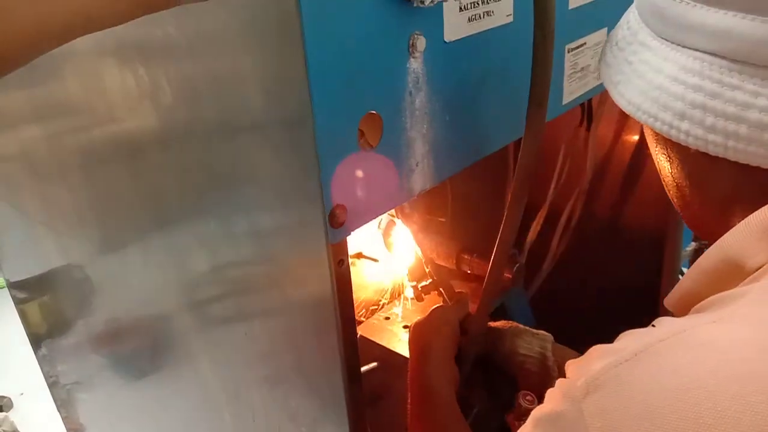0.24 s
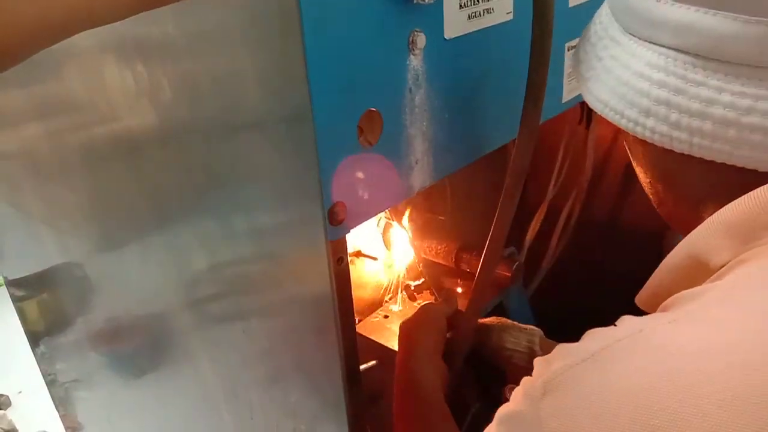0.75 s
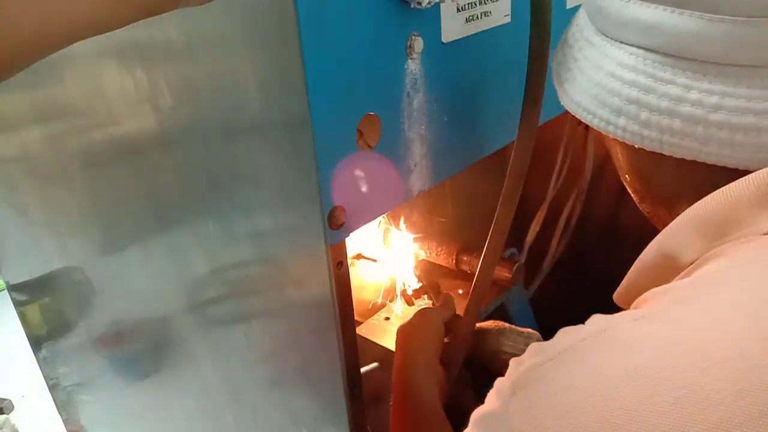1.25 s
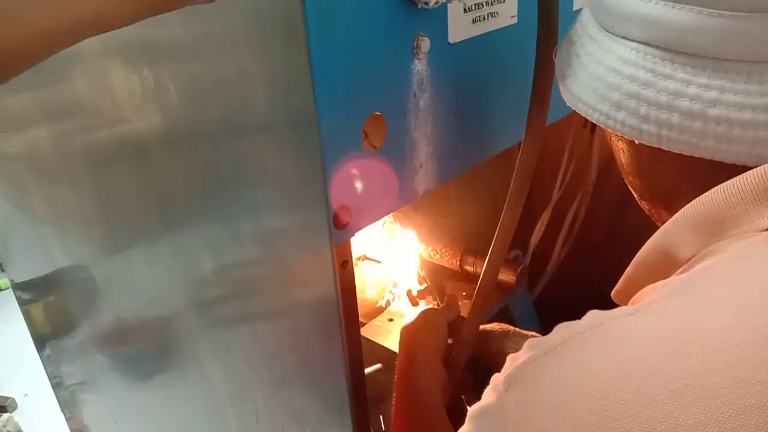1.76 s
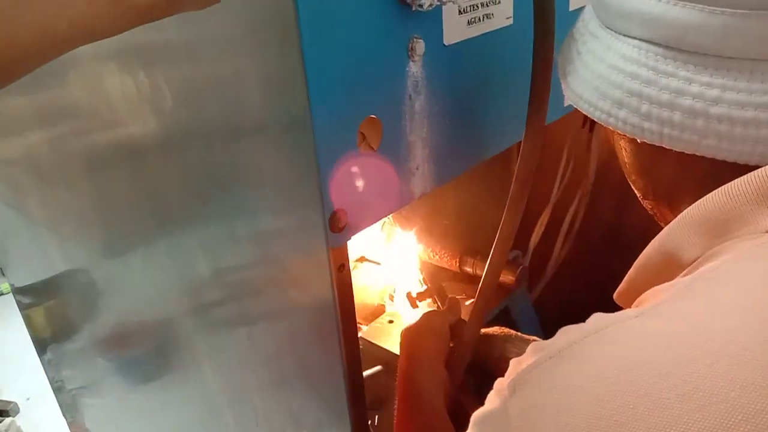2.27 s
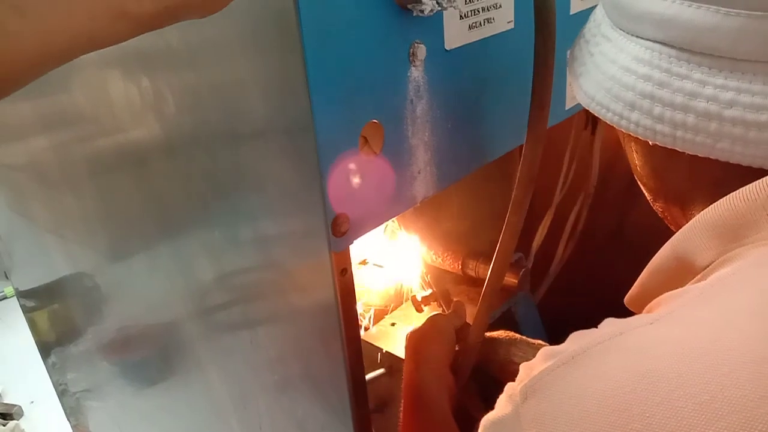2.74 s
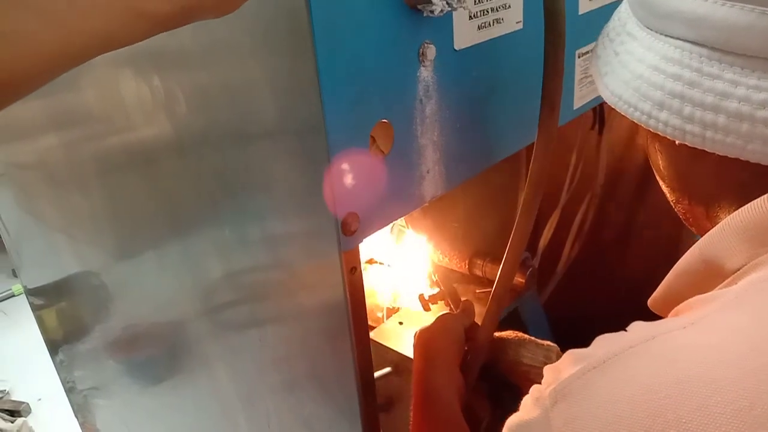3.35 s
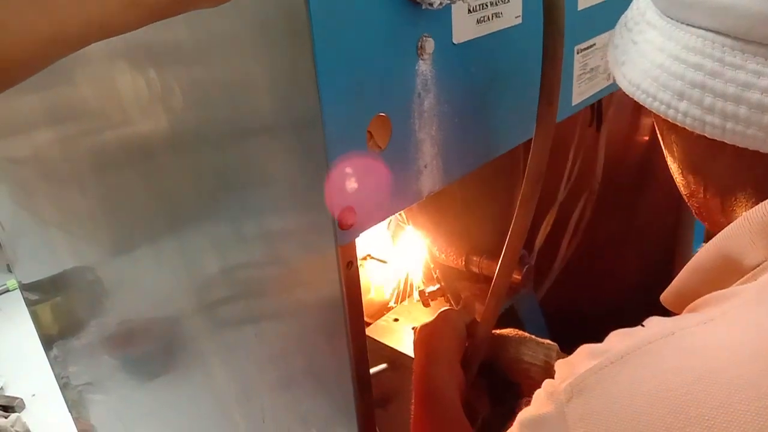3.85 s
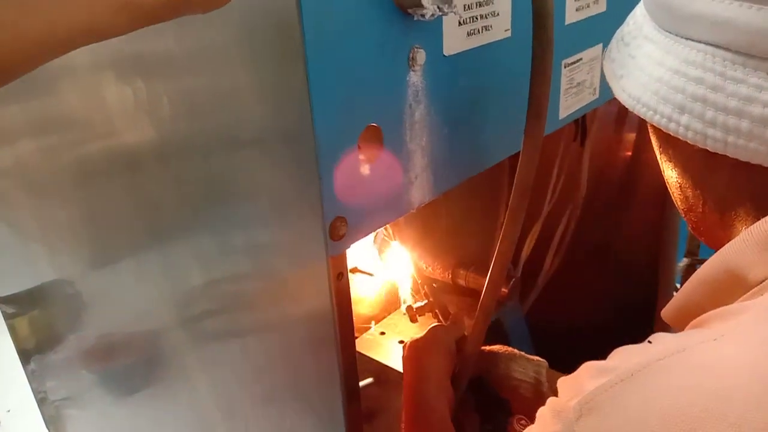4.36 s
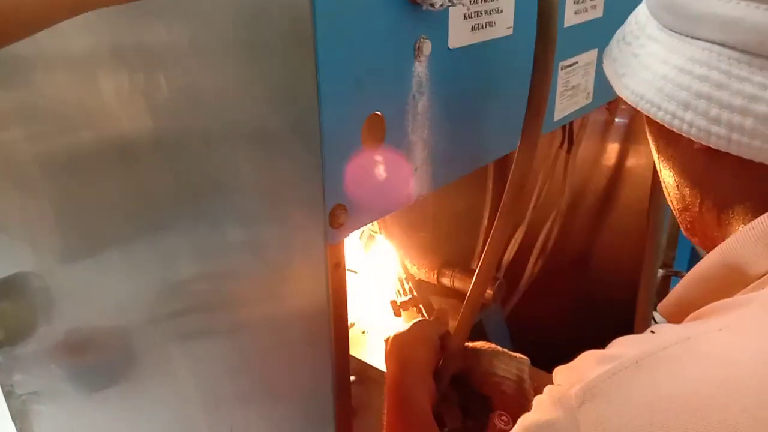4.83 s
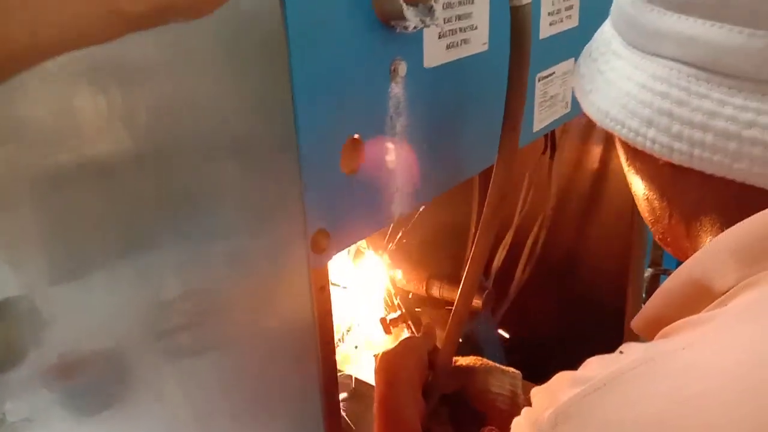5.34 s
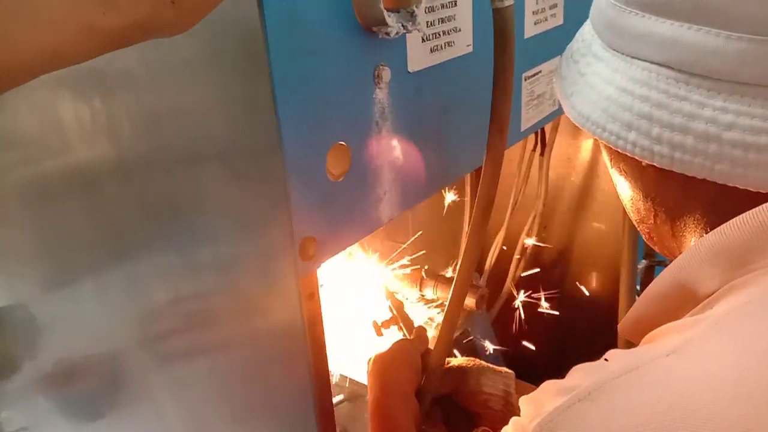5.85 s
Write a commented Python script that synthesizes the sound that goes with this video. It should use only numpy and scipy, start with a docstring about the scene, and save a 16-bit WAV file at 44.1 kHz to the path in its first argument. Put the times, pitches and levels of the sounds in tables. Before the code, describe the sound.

A cutting torch burns steel inside an open sheet-metal cabinet. A gusty midrange flame roar and bright oxygen hiss run throughout, surging unevenly over soft low puffs. Brief near-whistles ring from the hollow behind the cut, and fine metal spatter fizzes. A few sparks crackle, and the end grows rougher and more sizzling. Captured by a phone at arm's length, identical in both channels, with the extreme top missing.

```python
"""A gas flame roars and an oxygen jet hisses: a torch cuts steel inside an open sheet-metal cabinet.
Flame and jet are gusty noise filtered by the cabinet's resonances; the flame also flutters and puffs.
The jet rings the hollow behind the cut, at times almost whistling, and the slot adds a narrow edge tone.
Random droplet bursts make the steel fizz, and a few larger sparks crackle and die away.
An arm's length away, a phone takes it in without the extreme top."""
import sys
import numpy as np
from scipy import signal
from scipy.fft import rfft, irfft
from scipy.io import wavfile
from scipy.ndimage import uniform_filter1d, map_coordinates

SR = 44100
rng = np.random.default_rng(int(sys.argv[2]) if len(sys.argv) > 2 else 0)


def bounce(signal):
    """Save signal as a 16-bit WAV file at the path given by the first command-line argument."""
    frames = np.transpose(np.atleast_2d(signal))
    limited = np.clip(frames, -1, 1)
    pcm = np.round(limited * 32767).astype(np.int16)
    wavfile.write(sys.argv[1], SR, pcm)


N = 268877
TIME = np.arange(N) / SR  # s
FREQ = np.arange(N // 2 + 1) * SR / N  # Hz


# Flame roar spectrum. Each row: frequency in Hz, relative density in dB.
FLAME_COLOUR = [(300, -59), (450, -13.5), (600, -4.5), (1100, 0), (1500, -3), (2200, -2.5), (2700, -12),
                (4000, -45), (8000, -60)]
# Unsteady burning. Each row: time in seconds, flutter level in dB.
FLUTTER = [(0.0, -44), (0.49, -42), (0.52, -35.5), (0.71, -45.5), (0.75, -40), (1.17, -50), (1.38, -41.5),
           (2.43, -45.5), (2.68, -38), (2.94, -46), (3.69, -45.5), (3.72, -54), (4.01, -41), (5.43, -47),
           (5.77, -38), (5.84, -46), (5.98, -35), (6.1, -45)]
# Flutter spectrum. Each row: frequency in Hz, relative density in dB.
FLUTTER_COLOUR = [(30, -35), (55, -26), (85, -11.5), (130, -16), (220, -25), (300, -13), (450, -2.5),
                  (540, 2), (800, -33)]
# Flame puffs that shake the cabinet air. Each row: start in seconds, length in seconds,
# boom level in dB before puff_trim_db.
PUFFS = [(0.03, 0.085, -42.5), (1.65, 0.05, -46), (1.818, 0.073, -41), (1.94, 0.038, -42),
         (2.301, 0.032, -43), (2.405, 0.046, -45), (2.712, 0.038, -47), (2.794, 0.048, -43),
         (2.97, 0.11, -40.5), (3.925, 0.14, -39.5), (4.175, 0.044, -46), (4.242, 0.066, -42),
         (4.323, 0.03, -41), (4.374, 0.043, -44), (4.46, 0.034, -46), (4.558, 0.061, -43),
         (4.817, 0.044, -42), (5.899, 0.094, -42)]
# Boom spectrum. Each row: frequency in Hz, relative density in dB.
BOOM_COLOUR = [(40, -33), (75, -5), (120, 0), (210, -2), (260, -9), (330, -26), (700, -50)]
PUFF_ATTACK_S, PUFF_RELEASE_S = 0.025, 0.03
RUMBLE_DB, RUMBLE_GUST_DB, RUMBLE_PER_S = -53.5, 3.5, 12  # small puffs between the listed ones


def flame(roar_db, cabinet, roar_trim_db=4.5, puff_trim_db=-2.1):
    """Turbulent burning roars in the cabinet, over an uneven flutter and soft booming puffs."""
    roar = turbulence(cabinet * colour(FLAME_COLOUR), rate=45, gust_db=0.6)
    roar = roar * undb(roar_db + roar_trim_db)

    flutter_db, = curves(FLUTTER)
    flutter = turbulence(cabinet * colour(FLUTTER_COLOUR), rate=16, gust_db=3.0) * undb(flutter_db)

    puffs = swells(PUFFS, PUFF_ATTACK_S, PUFF_RELEASE_S) * undb(puff_trim_db)
    rumble = undb(RUMBLE_DB + RUMBLE_GUST_DB * walk(RUMBLE_PER_S))
    boom = turbulence(cabinet * colour(BOOM_COLOUR), rate=15, gust_db=0.5)
    boom = boom * np.hypot(puffs, rumble)  # powers add
    return roar + flutter + boom


# Jet hiss spectrum. Each row: frequency in Hz, relative density in dB.
OXYGEN_COLOUR = [(1400, -38.5), (2200, -6), (2700, -3.5), (4300, -4), (5900, -5), (6250, -10.5),
                 (6700, -7.5), (7650, -10.5), (8200, -23), (11000, -26), (13400, -28), (15500, -22.5)]


def oxygen(hiss_db, cabinet, trim_db=0.13):
    """The fast cutting jet hisses through the slot in the steel and echoes off the panels."""
    jet = turbulence(cabinet * colour(OXYGEN_COLOUR), rate=57, gust_db=0.27)
    return panels(jet, echo=0.15, longest_s=0.007, sway_s=0.00005) * undb(hiss_db + trim_db)


# Edge tone of the slot as the torch moves along. Each row: time in seconds, centre in Hz,
# level in dB over the hiss curve before trim_db.
SLOT = [(0, 7060, -27), (.5, 7100, -16), (.65, 6570, -16), (1.1, 6560, -8.5), (2.2, 6580, -19),
        (2.6, 7050, -31), (3.1, 7000, -16), (3.6, 7030, -13), (4.1, 7300, -25), (4.9, 7400, -19),
        (5.3, 7450, -22), (5.55, 7200, -10), (6.1, 7180, -15)]


def edge_tone(hiss_db, half_width_hz=160, trim_db=0.5):
    """A narrow band of hiss whose pitch follows the changing width of the slot."""
    centre_hz, lift_db = curves(SLOT)
    band = unit(shape(rng.standard_normal(N), 1 / (1 + (FREQ / half_width_hz) ** 2)))
    carrier = np.cos(2 * np.pi * np.cumsum(centre_hz) / SR)
    return unit(band * carrier) * undb(hiss_db + lift_db + trim_db)


# Close pair of the hollow. Each row: frequency in Hz, width in Hz, relative level in dB.
HOLLOW = [(1244, 16, 4), (1263, 11.7, 8.5)]
# Jet on the hollow behind the cut. Each row: time in seconds, level in dB before blow_trim_db.
BLOW = [(0.0, -39), (0.08, -33), (0.13, -42), (0.98, -32), (1.07, -41), (1.29, -32.5), (1.78, -32.5),
        (1.97, -26), (2.02, -37), (2.22, -44), (2.29, -30.5), (2.95, -35), (3.04, -25), (3.07, -30),
        (4.04, -37), (4.09, -31), (4.57, -33.5), (6.1, -30)]
# Near-whistles of the hollow. Each row: start in seconds, length in seconds,
# level in dB before whistle_trim_db.
WHISTLES = [(1.255, 0.034, -28), (1.32, 0.032, -28), (1.491, 0.03, -29), (1.68, 0.032, -29),
            (1.898, 0.076, -28), (2.3, 0.035, -25.5), (2.572, 0.036, -28.5), (2.7, 0.034, -30),
            (2.853, 0.045, -28.5), (3.007, 0.064, -26), (3.376, 0.036, -29.5), (3.692, 0.042, -30),
            (3.933, 0.048, -28), (4.059, 0.075, -28.5), (4.2, 0.14, -27), (4.398, 0.052, -27),
            (4.473, 0.052, -28.5), (4.685, 0.038, -29), (4.995, 0.03, -29), (5.176, 0.032, -30.5),
            (5.254, 0.068, -29.5), (5.33, 0.034, -28), (5.833, 0.04, -26), (6.016, 0.038, -28)]
# Lower ring of the gap, a close pair. Each row: frequency in Hz, width in Hz, relative level in dB.
GAP_LOWER = [(1751, 18, 1), (1803.5, 26, 2)]
# Strength of the lower ring. Each row: time in seconds, level in dB before gap_trim_db.
GAP = [(0.0, -45), (1.02, -35.5), (1.12, -44), (1.42, -32), (1.53, -41), (1.65, -36), (4.02, -37.5),
       (4.09, -29.5), (4.8, -36.5), (5.81, -37), (5.89, -30), (6.1, -39)]
# Broad upper ring of the gap. Each row: frequency in Hz, width in Hz, relative level in dB.
GAP_UPPER = [(3820, 380, 0)]
WHISTLE_ATTACK_S, WHISTLE_RELEASE_S = 0.02, 0.019
GAP_UPPER_DB = -8  # over the hiss curve


def hollow(hiss_db, waver_db=2.5, wavers_per_s=11,
           blow_trim_db=-0.5, whistle_trim_db=0.7, gap_trim_db=0.3):
    """The jet rings the hollow and the gap behind the cut; now and then the hollow nearly whistles."""
    blow_db, = curves(BLOW)
    gap_db, = curves(GAP)
    blow = undb(blow_db + blow_trim_db + waver_db * walk(wavers_per_s))
    whistles = swells(WHISTLES, WHISTLE_ATTACK_S, WHISTLE_RELEASE_S) * undb(whistle_trim_db)
    main = ring(HOLLOW, skirt_hz=65, steadiness=0.81) * np.maximum(blow, whistles)
    lower = ring(GAP_LOWER, skirt_hz=110, steadiness=0.26) * undb(gap_db + gap_trim_db)
    upper = ring(GAP_UPPER, skirt_hz=400, steadiness=0.1) * undb(hiss_db + GAP_UPPER_DB)
    return main + lower + upper


def ring(modes, skirt_hz, steadiness):
    """Gas drives resonances close to a whistle, which evens out their swell."""
    skirt = 1 / (1 + ((FREQ - modes[-1][0]) / skirt_hz) ** 2)
    tone = unit(shape(rng.standard_normal(N), np.sqrt(resonances(modes)) * skirt))
    power = uniform_filter1d(tone ** 2, size=1500)  # over 34 ms
    return unit(tone / power ** (steadiness / 2))


# Jet skimming an edge of the cut. Each row: start in seconds, length in seconds, level in dB,
# centre in Hz, width in Hz.
RUSHES = [(.45, 0.87, -39, 2220, 340), (4.15, 0.32, -30.5, 1490, 380)]
RUSH_ATTACK_S, RUSH_RELEASE_S = 0.11, 0.089


def rushes():
    """A broad band of noise swells while the jet skims an edge."""
    total = np.zeros(N)
    for start_s, length_s, db, centre_hz, width_hz in RUSHES:
        band = 1 / (1 + (2 * (FREQ - centre_hz) / width_hz) ** 4)
        swell = swells([(start_s, length_s, db)], RUSH_ATTACK_S, RUSH_RELEASE_S)
        total += turbulence(band, rate=45, gust_db=0.2) * swell
    return total


# Droplet fizz spectrum. Each row: frequency in Hz, relative density in dB.
SPATTER_COLOUR = [(1500, -25), (3500, -12), (7400, 2.5), (8300, -0.5), (9400, 2.5), (11000, 1),
                  (12300, -2.5), (13700, -12), (14700, 3), (15500, -3)]


def spatter(fizz_db, per_second=6000, spread_db=1.5, trim_db=1.8):
    """Countless droplets of molten steel burst at random, fewer the larger they are."""
    bursts = rng.random(N) < per_second / SR
    size = undb(spread_db * np.minimum(rng.exponential(size=N), 5))
    fizz = shape(bursts * size * rng.standard_normal(N), colour(SPATTER_COLOUR))
    return panels(fizz, echo=0.37, longest_s=0.008, sway_s=0.00004) * undb(fizz_db + trim_db)


# Sparks that burst. Each row: start in seconds, initial level in dB, fade time to -60 dB in seconds.
SPARKS = [(2.651, -27, 0.2), (3.695, -43, 0.8), (5.532, -35, 1)]
# Spark spectrum. Each row: frequency in Hz, relative density in dB.
SPARK_COLOUR = [(1000, -22), (3000, 9), (7000, 4), (9000, -0.5), (13000, -2), (15500, 3)]


def sparks(crackle_db=2.0):
    """A larger spark cracks at once and dies away exponentially in a crackle."""
    fade = np.zeros(N)
    for start_s, db, t60_s in SPARKS:
        age_s = np.maximum(TIME - start_s, 0)
        fade += (TIME >= start_s) * undb(db) * np.exp(-np.log(1000) * age_s / t60_s)
    return fade * turbulence(colour(SPARK_COLOUR), rate=1000, gust_db=crackle_db)


def panels(x, echo, longest_s, sway_s, count=8):
    """Short echoes off the steel panels; their paths shift as the hand moves the torch."""
    out = x
    for lag_s in rng.uniform(longest_s / 10, longest_s, count):
        path_s = lag_s + sway_s * walk(0.8)
        out = out + echo * map_coordinates(x, [(TIME - path_s) * SR], order=3, mode="wrap")
    return unit(out)


def turbulence(gain, rate, gust_db):
    """Gas noise that comes in eddies, filtered by gain."""
    eddies = undb(gust_db * walk(rate))
    return unit(shape(eddies * rng.standard_normal(N), gain))


def walk(rate):
    """Smooth random curve of rms 1 that changes about rate times a second."""
    return unit(shape(rng.standard_normal(N), np.exp(-(FREQ / rate) ** 2)))


def swells(events, attack_s, release_s):
    """Gain of (start, length, dB) events that each rise, hold and fall away; the loudest wins."""
    gains = []
    for start_s, length_s, db in events:
        end_s = start_s + length_s
        corners_s = [start_s - attack_s, start_s, end_s, end_s + release_s]
        gains.append(undb(db) * np.interp(TIME, corners_s, [0, 1, 1, 0]))
    return np.max(gains, axis=0)


def resonances(modes):
    """Summed power response of (Hz, width in Hz, dB) resonances."""
    return sum(undb(db) ** 2 / (1 + (2 * (FREQ - hz) / width_hz) ** 2) for hz, width_hz, db in modes)


def colour(points):
    """Gain per frequency from (Hz, dB) points, joined on a log frequency axis."""
    hz, db = np.transpose(points)
    return undb(np.interp(np.log(FREQ + 1), np.log(hz), db))


def curves(table):
    """Each column of a time table, sample by sample."""
    s, *columns = np.transpose(table)
    return [np.interp(TIME, s, c) for c in columns]


def shape(x, gain):
    """Filter by a gain per frequency."""
    return irfft(rfft(x) * gain, N)


def unit(x):
    """Scale to rms 1."""
    return x / np.sqrt(np.mean(x ** 2))


def undb(db):
    """Decibels to gain."""
    return 10 ** (np.asarray(db) / 20)


# Course of the cut. Each row: time in seconds, flame roar in dB, oxygen hiss in dB,
# spatter fizz in dB, all before the surge and each source's trim.
CUT = [(0.0, -32.5, -32.5, -48), (0.1, -37.5, -34, -50), (0.29, -37, -33.5, -52),
       (0.49, -32.5, -29.5, -44.5), (0.66, -37, -35, -50), (0.75, -33, -29.5, -45),
       (0.92, -37.5, -33.5, -44), (0.95, -33, -29.5, -41), (1.14, -37.5, -37.5, -44.5),
       (1.32, -31, -32, -46.5), (1.56, -36, -35.5, -49), (1.82, -30, -31, -45.5), (2.12, -35, -34.5, -49),
       (2.63, -31, -32.5, -49), (2.65, -31, -32, -47), (2.9, -33, -33, -51), (3.23, -31.5, -30.5, -49),
       (4.01, -33.5, -33.5, -52), (4.13, -30, -27, -52), (4.31, -31, -31.5, -52), (4.35, -29.5, -28, -49.5),
       (5.04, -32.5, -31.5, -45.5), (5.28, -29.5, -30, -46), (5.38, -35.5, -34.5, -47),
       (5.59, -33.5, -28, -41), (5.65, -34.5, -35.5, -47), (5.76, -27, -28.5, -39.5),
       (5.82, -34.5, -29.5, -44), (5.89, -28, -28, -43), (6.1, -29.5, -31, -43)]
# Air and panel resonances of the cabinet. Each row: frequency in Hz, width in Hz,
# resonant power in dB over the direct sound.
CABINET = [(85.5, 6.6, 2.5), (133, 13, 7.5), (206.2, 24, 20), (292.4, 11.8, 22), (349.6, 32, 15),
           (393.2, 7.3, 18.5), (570, 14.7, 12), (656, 5.6, 13.5), (740.5, 28, 9), (795, 5.9, 12),
           (859, 9.5, 8.5), (958, 12, 10.5), (1042, 46, 6.5), (1080.4, 9.2, 12), (1151, 12.5, 11),
           (1304, 12.6, 13), (1367, 40, 10.5), (1434, 7.3, 15), (1492, 15.5, 12), (1563, 120, 6.5),
           (1973, 48, 8.5), (2185, 49, 7), (2585, 52, 3), (3055, 250, 2.5)]
SURGE_DB, SURGES_PER_S = 0.58, 11.3  # the gas flow is never quite even


def scene():
    """Roar, hiss and fizz surge together; the sum reaches both channels alike."""
    roar_db, hiss_db, fizz_db = np.array(curves(CUT)) + SURGE_DB * walk(SURGES_PER_S)
    cabinet = np.sqrt(1 + resonances(CABINET))
    gas = flame(roar_db, cabinet) + oxygen(hiss_db, cabinet)
    gas = gas + edge_tone(hiss_db) + hollow(hiss_db) + rushes()
    torch = gas + spatter(fizz_db) + sparks()
    return np.array([torch, torch])


TOP_HZ = 15550


def record(dry):
    """The phone cuts the top with a steep low-pass."""
    low_pass = signal.ellip(12, 0.1, 80, TOP_HZ, fs=SR, output="sos")  # ripple, stopband in dB
    return signal.sosfilt(low_pass, dry)


dry = scene()
out = record(dry)
bounce(out)
```